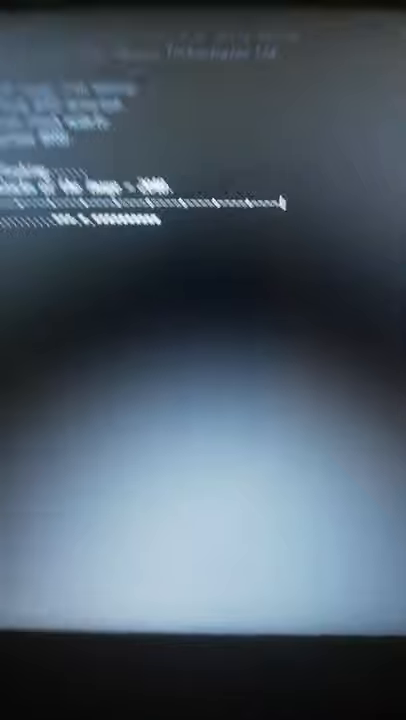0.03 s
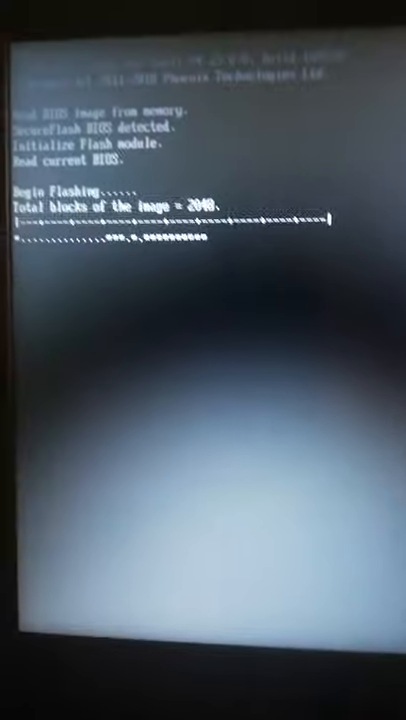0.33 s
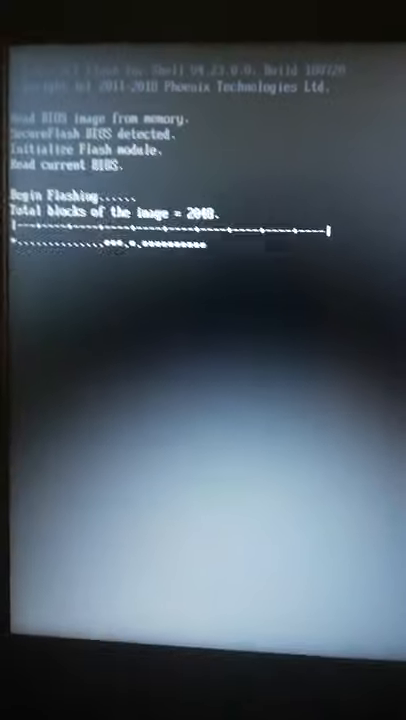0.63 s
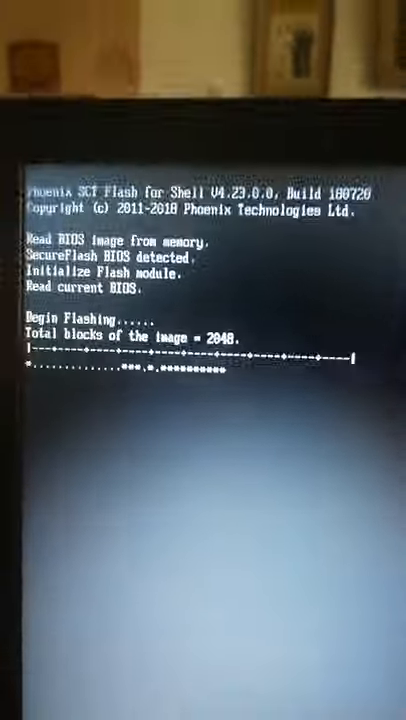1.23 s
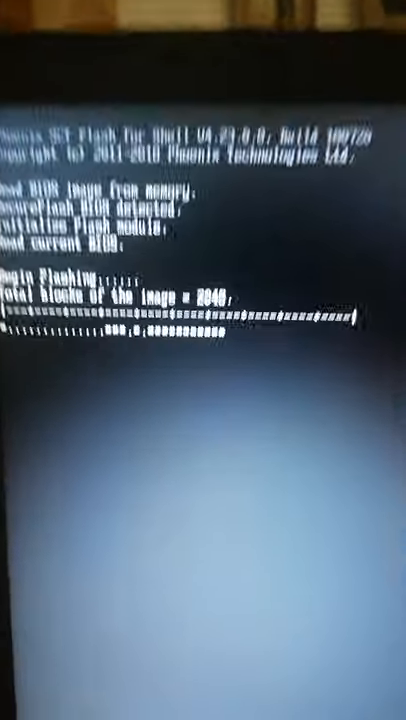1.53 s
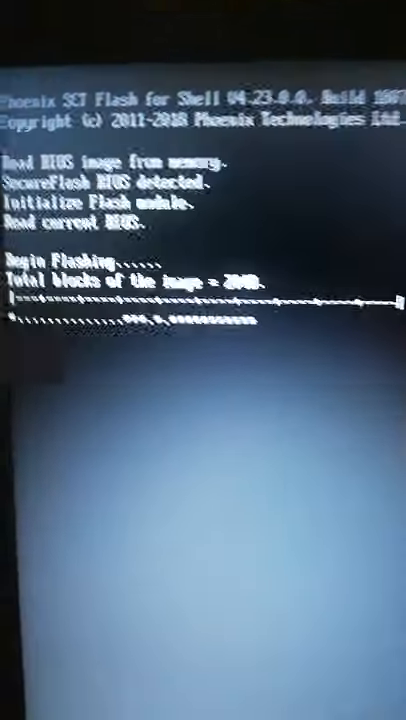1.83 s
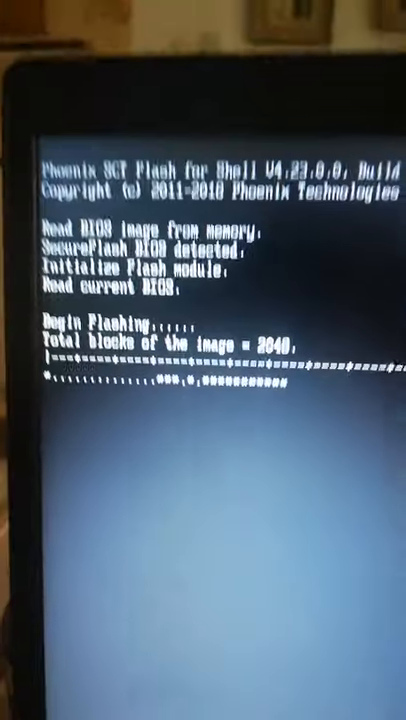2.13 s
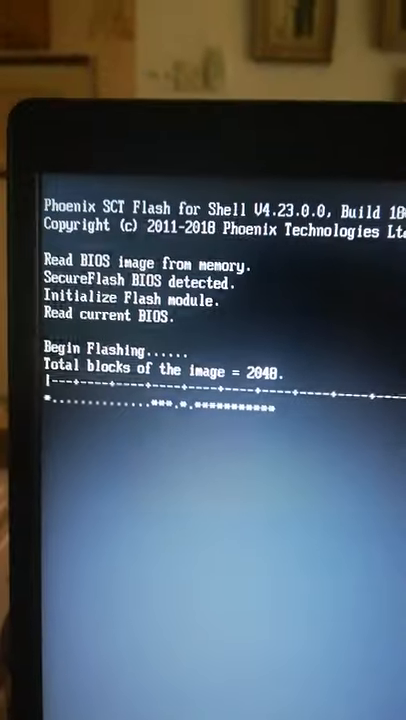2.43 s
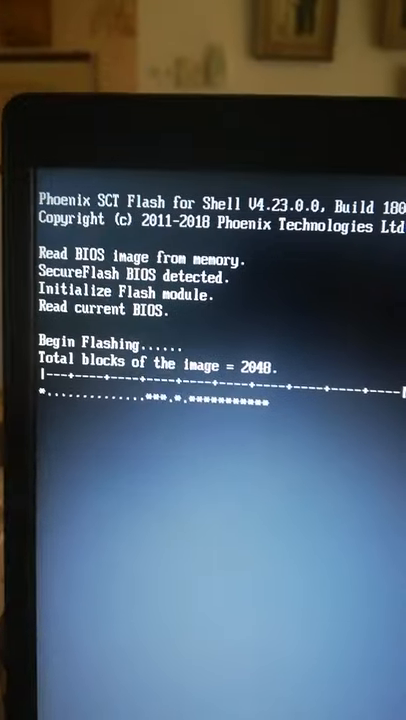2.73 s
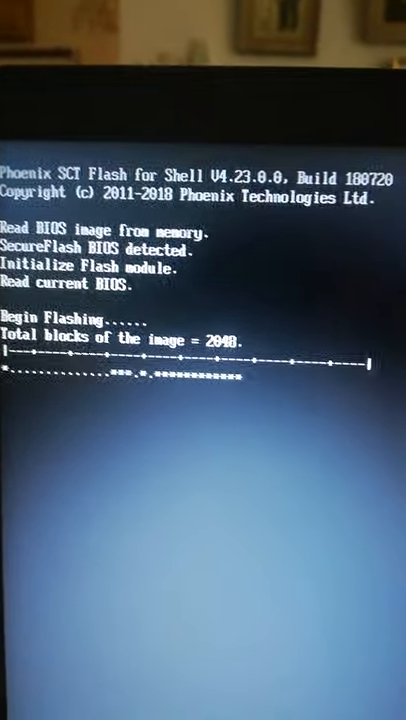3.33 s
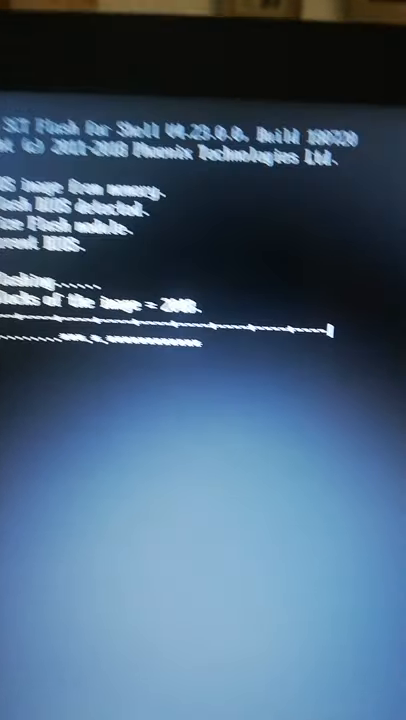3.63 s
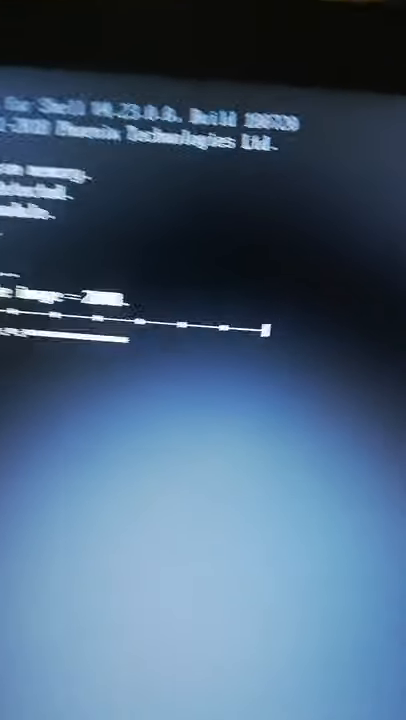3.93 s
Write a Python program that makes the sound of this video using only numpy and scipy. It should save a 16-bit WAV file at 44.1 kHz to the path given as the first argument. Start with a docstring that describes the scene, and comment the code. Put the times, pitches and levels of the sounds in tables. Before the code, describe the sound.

Steady laptop fan noise up close, with brief handling knocks and two soft late hoots.

```python
"""A laptop fan running flat out in a quiet room, close up on the two microphones of a hand-held phone.
Air rushes through the vent over a low hum and a thin whine; the colour of the rush shifts as the phone
drifts back from the screen. Fingers bump the phone and brush it once, and its case ticks.
Near the end, off to the right, come two soft, almost pure hoots, the second broken in the middle."""
import sys
import numpy as np
from scipy import signal
from scipy.fft import rfft, irfft
from scipy.io import wavfile
from scipy.ndimage import uniform_filter1d

SR = 44100
rng = np.random.default_rng(int(sys.argv[2]) if len(sys.argv) > 2 else 0)


def pcm_store(signal):
    """Save signal as 16-bit PCM."""
    levels = np.round(np.clip(np.atleast_2d(signal), -1, 1) * 32767)
    wavfile.write(sys.argv[1], SR, levels.astype(np.int16).T)


N = 176400

# spectrum of the vent air, before the gains below: frequency_hz, left_db, right_db
AIR_SPECTRUM = [(20, -79.5, -83), (32.5, -76.9, -75), (53, -80.1, -80.0), (75.5, -73.5, -74.5),
                (108, -77.5, -77.5), (115, -80.5, -82.5), (137, -77, -77), (229, -81.5, -81),
                (300, -81.5, -80.5), (460, -87, -81.5), (700, -86, -81), (943, -88, -79), (1540, -91, -85),
                (2010, -90.5, -83.5), (2350, -96.5, -88.5), (2660, -90.5, -86), (3730, -97.5, -82.5),
                (4270, -96.1, -88.5), (4770, -97.5, -92.5), (5700, -95, -95), (6500, -96, -95.5),
                (9270, -103.7, -95), (11440, -111.6, -94), (12600, -113.5, -99.2), (14200, -115.6, -101.4),
                (16000, -120.5, -109.3)]
# how alike the air is at the two microphones: frequency_hz, coherence (0-1)
MIC_COHERENCE = [(20, .995), (150, 1), (260, 0.8), (420, 0.68), (700, 0.67), (1050, 0.47), (1600, 0.51),
                 (2300, 0.063), (2800, 0.57), (4000, 0.21), (6500, 0.25), (9000, 0.3), (15000, .12)]
# phase lead of the left microphone: frequency_hz, lead_rad
LEFT_MIC_LEAD = [(20, 0), (200, 0.27), (330, -0.04), (500, -2.5), (800, -3.5), (1100, -3), (1400, -7.5),
                 (2700, -9), (4000, -10.5), (5500, -13), (6300, -14.5), (9000, -17.5)]
# fan housing resonances that the air excites: centre_hz, width_hz, gain_db
HOUSING_RESONANCES = [(666, 17, 4), (891, 16, 3), (1010, 23, 2), (1123, 27, -1), (1344, 40, 1.5),
                      (1915, 34, 1), (3110, 12, 1.5), (5060, 110, 2)]
# rise and fall of the whole rush: time_s, gain_db
RUSH_GAIN = [(.34, 4), (.38, 2.5), (.45, 1), (.8, 0.2), (1.5, -0.05), (2.6, 0.22), (3.5, 0.07), (4, 0.9)]
# bass below about 60 Hz, swelling as the hand shifts: time_s, gain_db
RUMBLE_GAIN = [(.34, 7.5), (.5, -1), (1.3, -2), (2.2, 1), (2.9, 1), (3.3, -6), (3.78, 2.5), (4, 1.5)]
# where the phone is held: time_s, distance (0 = close to the screen, 1 = drawn back)
PHONE_DISTANCE = [(.34, 0.085), (.95, 0.049), (1.3, 0.62), (1.7, 0.38), (2.1, 0.97), (3.4, 0.87), (4, 0.77)]
# bands lifted or dented by that distance:
# centre_hz, width_hz, left_close_db, left_back_db, right_close_db, right_back_db
REFLECTION_BANDS = [(1040, 180, 1.5, -1, 1, -0.9), (2230, 230, -4.5, -0.5, 6.5, -0.5),
                    (3230, 380, 2.5, -1.5, 0.5, -0.5), (3680, 340, -0.5, 2, -2.5, 1.46),
                    (5030, 350, -1, 2.3, -3, 1.2), (6700, 260, 4, 1.5, 4.5, -.3),
                    (8110, 500, -1, 1.5, 1, 1), (10670, 380, -4, -2, -1, 5), (11600, 350, -1, 0, 2.5, 0),
                    (13400, 800, -1, 1, 1.5, 0.5)]
# low tones of the fan: pitch_hz, left_db, right_db, wander (share of the pitch)
HUM_TONES = [(77.6, -70.5, -69.5, .035), (144.8, -69, -68.5, 0.0422)]
# the whine at each microphone: time_s, left_db, right_db
WHINE_LEVELS = [(.4, -83, -80), (1.0, -73, -75), (1.4, -71, -79), (2.0, -78, -79), (2.6, -74.5, -81),
                (3.3, -74.5, -78), (4, -75, -78)]
# fingers knocking the phone: time_s, level_db (before panning), pitch_hz
FINGER_BUMPS = [(.366, -40, 300), (.5210, -41, 250), (.6124, -29, 290), (.7269, -28.5, 232),
                (.9172, -28.5, 207)]
# snaps of the case: start_s, left_gain_db, right_gain_db, tilt_db_per_octave
CASE_TICKS = [(.632, -55, -43, 3), (1.4484, -30, -37.5, -3), (3.9938, -42, -25.5, 3)]
# ringing of the case: pitch_hz, relative_db, t60_s
CASE_MODES = [(3000, -8, 0.0046), (4200, -10, 0.0036), (8100, -9, 0.0056), (12400, -12, .003),
              (14300, -7, .004)]
# one contour per hoot, direct sound at the right microphone: time_s, level_db, pitch_hz
HOOT_CONTOURS = [
    [(3.15, -64, 388), (3.198, -37, 430), (3.218, -35.5, 444), (3.25, -24.5, 441), (3.272, -28, 445),
     (3.29, -28, 440), (3.315, -43.5, 437.7), (3.372, -41.5, 450), (3.41, -62, 452)],
    [(3.815, -65, 425), (3.84, -39.5, 434), (3.857, -27.5, 418), (3.876, -44.5, 440), (3.898, -30, 439),
     (3.914, -37, 436), (3.93, -56, 432), (3.98, -45.5, 430), (4.0, -61, 430)],
]


def undb(db):
    """Decibels to gain."""
    return 10 ** (np.asarray(db) / 20)


def curve(at, table, column=1):
    """One column of a table, joined by straight lines."""
    rows = np.array(table, float)
    return np.interp(at, rows[:, 0], rows[:, column])


def over_hz(hz, table, column=1):
    """One column of a spectrum table, joined on a log-frequency axis."""
    rows = np.array(table, float)
    return np.interp(np.log(np.maximum(hz, 1)), np.log(rows[:, 0]), rows[:, column])


def walk(rate):
    """Random levels held 1 / rate s and smoothed twice; spread 1."""
    hold = int(SR / rate)
    steps = np.repeat(rng.standard_normal(N // hold + 1), hold)
    smooth = uniform_filter1d(uniform_filter1d(steps, hold), hold)[:N]
    return smooth / smooth.std()


def tone(hz):
    """A sine that follows a pitch curve."""
    return np.sin(2 * np.pi * np.cumsum(hz) / SR)


def bell(x, centre, width):
    """A bell curve, 1 at its centre."""
    return np.exp(-.5 * ((x - centre) / width) ** 2)


def vent_rush(t):
    """Turbulent air from the vent, partly alike at the two microphones and coloured by their distance."""
    flicker_db, trim_db = 0.38, -0.38
    hz = np.arange(N // 2 + 1) * SR / N
    right, unrelated = rfft(rng.standard_normal((2, N)))
    coherence = over_hz(hz, MIC_COHERENCE)
    left = coherence * right + np.sqrt(1 - coherence ** 2) * unrelated
    left *= np.exp(1j * over_hz(hz, LEFT_MIC_LEAD))
    air_db = [over_hz(hz, AIR_SPECTRUM, column) for column in (1, 2)]
    housing_db = sum(db * bell(hz, centre, width) for centre, width, db in HOUSING_RESONANCES)
    spectra = np.array([left, right]) * undb(air_db) * undb(housing_db) * np.sqrt(SR / 2)
    octave = np.log2(np.maximum(hz, 32) / 32)
    air = np.zeros((2, N))
    for band in range(10):  # each octave flickers on its own; the lowest also swells
        weight = np.maximum(1 - abs(octave - band), 0)
        gain_db = flicker_db * walk(9) + (band == 0) * curve(t, RUMBLE_GAIN)
        air += irfft(spectra * weight, N) * undb(gain_db)
    distance, unreflected = curve(t, PHONE_DISTANCE), rfft(air)
    for centre, width, left_close, left_back, right_close, right_back in REFLECTION_BANDS:
        lift_db = np.outer([left_close, right_close], 1 - distance)
        lift_db += np.outer([left_back, right_back], distance)
        air += irfft(unreflected * bell(hz, centre, width), N) * (undb(lift_db) - 1)
    return air * undb(trim_db + curve(t, RUSH_GAIN))


def fan_hum():
    """The fan's two low tones, unsteady in pitch and level."""
    waver_db = 0.7
    hum = np.zeros((2, N))
    for hz, left_db, right_db, wander in HUM_TONES:
        partial = np.sqrt(2) * tone(hz * (1 + wander * walk(25)))
        hum += undb([[left_db], [right_db]]) * partial * undb(waver_db * walk(8))
    return hum


def fan_whine(t):
    """A thin, high tone whose level at each microphone changes as the phone moves."""
    pitch_hz, wander = 5991, 0.000514
    level_db = [curve(t, WHINE_LEVELS, column) for column in (1, 2)]
    return np.sqrt(2) * tone(pitch_hz * (1 + wander * walk(14))) * undb(level_db)


def finger_bumps(t):
    """A soft fingertip rocks the phone through one swing; the body rings briefly."""
    width_s, skew_rad, ring_db, ring_t60_s = .0012, 1.4, -15, 0.055
    lag_s, pan_db = 0.00077, 5  # the left microphone is shaken sooner and harder
    side = np.array([[.5], [-.5]])
    out = np.zeros((2, N))
    for at, db, hz in FINGER_BUMPS:
        age = t - at + side * lag_s
        swing = bell(age, 0, width_s)
        ring = (age > 0) * undb(ring_db) * np.exp(-np.log(1000) * abs(age) / ring_t60_s)
        out += undb(db) * (swing + ring) * np.cos(2 * np.pi * hz * age - skew_rad)
    return out * undb(side * pan_db)


def case_ticks(t):
    """Tiny snaps: a dry crack, and the plastic case rings for a few milliseconds."""
    crack_db, crack_decay_s, tilt_pivot_hz = -3.5, .0005, 8000
    high_pass = signal.butter(2, 1800, "high", fs=SR, output="sos")
    out = np.zeros((2, N))
    for at, left_db, right_db, tilt in CASE_TICKS:
        age = np.maximum(t - at, 0)
        noise = signal.sosfilt(high_pass, rng.standard_normal(N))
        tick = undb(crack_db) * noise * (t > at) * np.exp(-np.minimum(age / crack_decay_s, 60))
        for hz, db, t60 in CASE_MODES:
            gain = undb(db + tilt * np.log2(hz / tilt_pivot_hz))
            decay = np.exp(-np.log(1000) * np.minimum(age / t60, 10))
            tick += gain * decay * np.sin(2 * np.pi * hz * age)
        out += undb([[left_db], [right_db]]) * tick
    return out


def finger_swish(t):
    """Skin slides briefly beside the right microphone: a faint, high hiss."""
    hz = np.arange(N // 2 + 1) * SR / N
    hiss = irfft(rfft(rng.standard_normal(N)) * bell(hz, centre=12200, width=1400), N)
    stroke = undb(-62) * bell(t, centre=0.89, width=.04)
    return np.array([np.zeros(N), hiss / hiss.std() * stroke])


def hoots(t):
    """Near-pure tones that scoop up to pitch, swell and fade, off to the right, with a short room tail."""
    rough_db, room_db, room_t60_s = 1, -19.5, 0.38
    left_db, left_lag_s = -7, .00075
    voice = np.zeros(N)
    for contour in HOOT_CONTOURS:
        at, db, hz = np.array(contour).T
        sounding = (t > at[0]) * (t < at[-1])
        voice += undb(np.interp(t, at, db)) * sounding * tone(np.interp(t, at, hz))
    voice *= undb(rough_db * walk(170))
    tail = rng.standard_normal((2, SR)) * np.exp(-np.log(1000) * t[:SR] / room_t60_s)
    room = signal.fftconvolve(voice[None], tail, axes=1)[:, :N]
    room *= undb(room_db) * voice.std() / room.std(axis=1, keepdims=True)
    direct = np.array([np.interp(t - left_lag_s, t, voice), voice])
    return (direct + room) * undb([[left_db], [0]])


def scene():
    """The fan in front, handling noise on the phone itself and the hoots to one side."""
    t = np.arange(N) / SR
    fan = vent_rush(t) + fan_hum() + fan_whine(t)
    return fan + finger_bumps(t) + case_ticks(t) + finger_swish(t) + hoots(t)


def record(dry):
    """The phone opens its microphones after a moment and cuts the top of the treble."""
    start_s, top_hz = .342, 15700
    live = np.arange(N) / SR > start_s
    low_pass = signal.ellip(10, .2, 70, top_hz, fs=SR, output="sos")
    return signal.sosfilt(low_pass, dry * live)


dry = scene()
out = record(dry)
pcm_store(out)
```